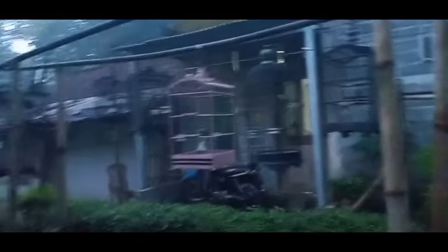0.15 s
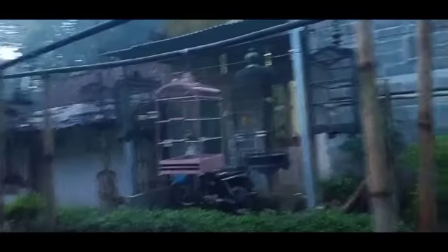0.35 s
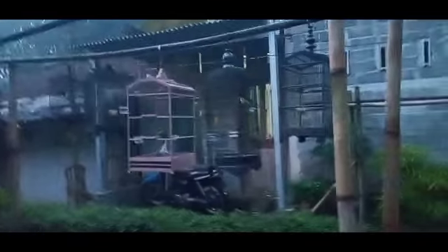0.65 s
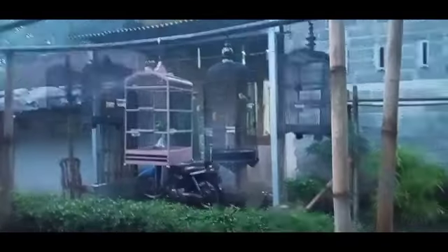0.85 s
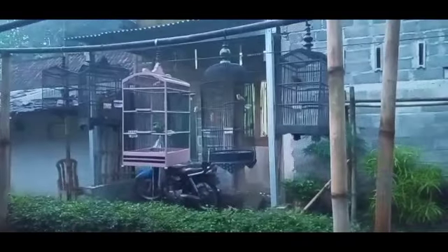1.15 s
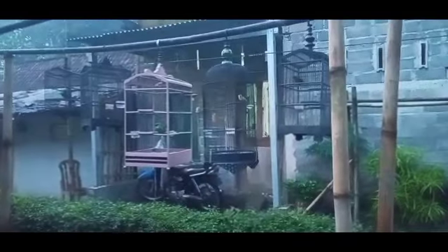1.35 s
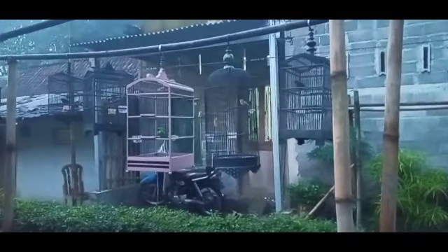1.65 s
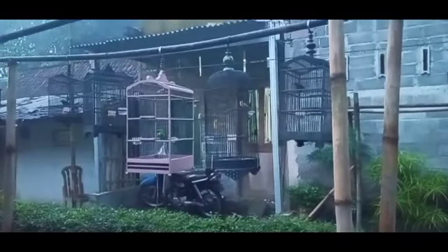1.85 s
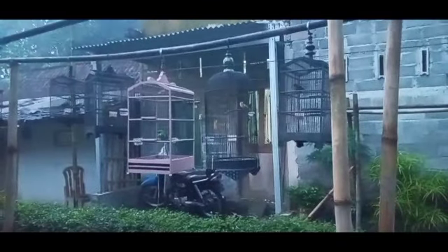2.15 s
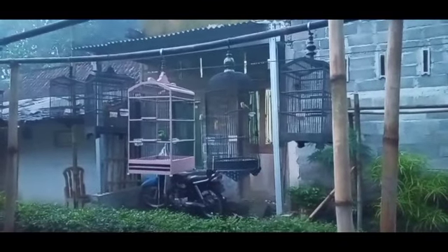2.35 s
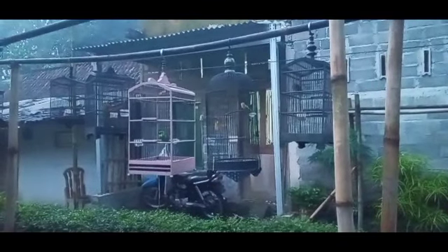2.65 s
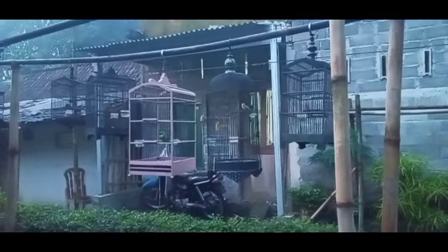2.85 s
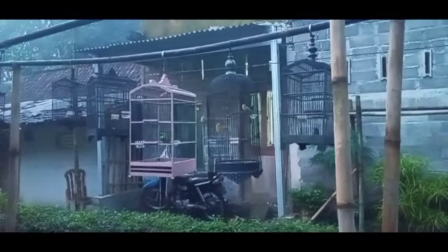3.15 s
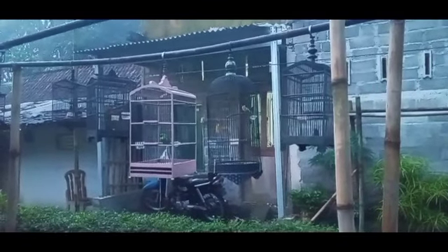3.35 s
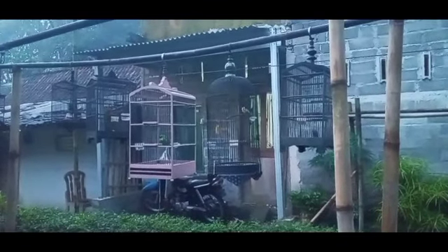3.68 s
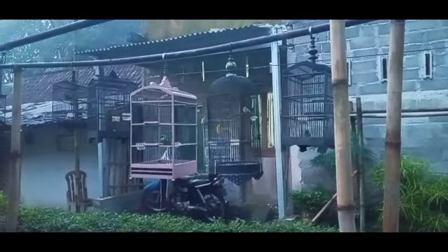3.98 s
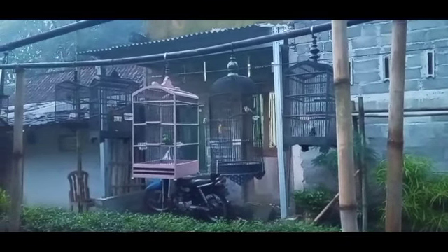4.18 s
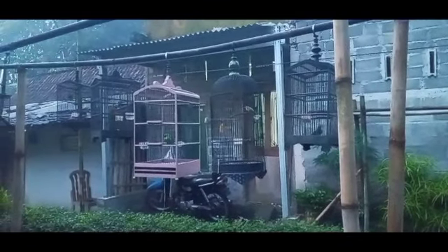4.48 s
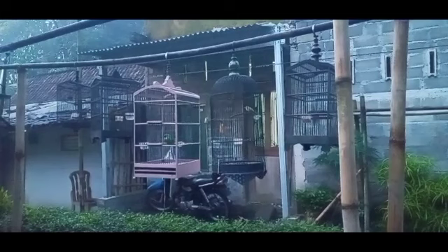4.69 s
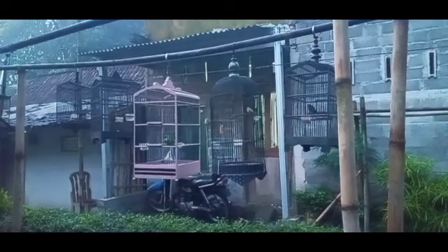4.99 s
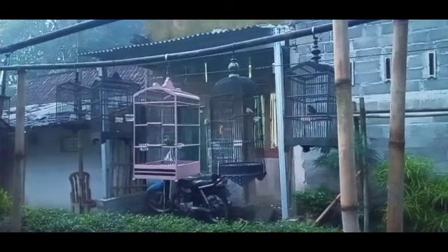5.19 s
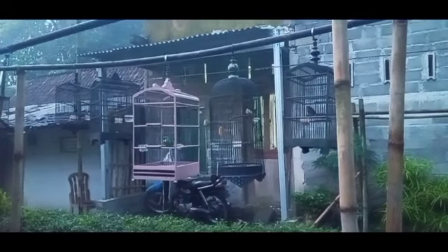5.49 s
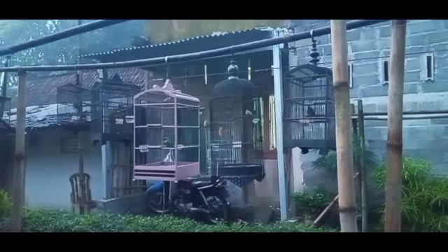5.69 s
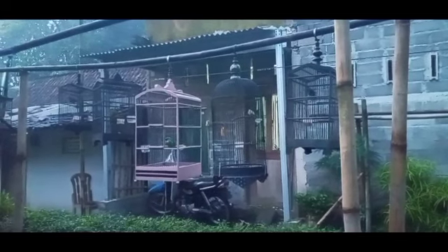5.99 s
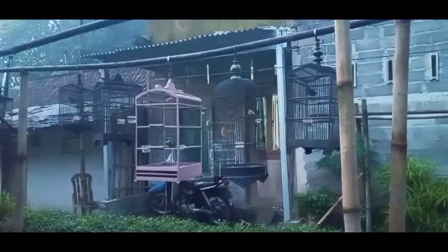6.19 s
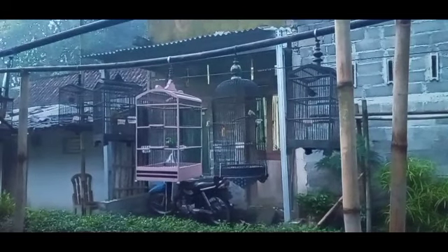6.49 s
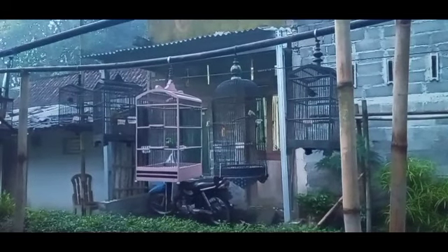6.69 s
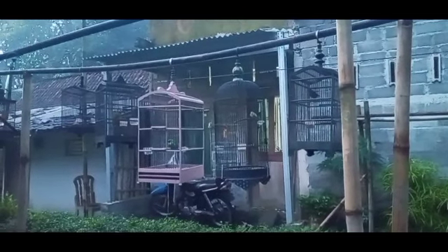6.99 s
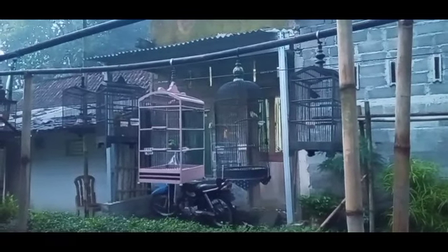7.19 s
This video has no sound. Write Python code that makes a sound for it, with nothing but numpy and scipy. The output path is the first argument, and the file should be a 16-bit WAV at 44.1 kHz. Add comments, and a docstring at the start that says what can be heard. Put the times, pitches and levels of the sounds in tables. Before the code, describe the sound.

Close, piercing birdsong at dawn: sliding high whistles, then a steady run of chirped triplets, with far-off hoarse crowing and soft yard hiss.

```python
"""Caged songbirds at dawn

Early morning under the eaves of a village house, heard by two microphone ports close to the cages.
One near bird pours out loud falling whistles and another repeats triple chirps: gliding, nearly pure tones.
Other birds call from further off; distant roosters crow in strained pulses, and a cage rings under hopping feet.
Insects buzz as narrow wavering tones over shaped noise for the village rumble and hiss.
Walls and roof answer with separate echoes, dense scatter and a yard tail; the loud song ducks the rest."""
import sys
import numpy as np
from scipy import signal
from scipy.fft import rfft, irfft, next_fast_len
from scipy.io import wavfile
from scipy.ndimage import uniform_filter1d

SR = 44100
rng = np.random.default_rng(int(sys.argv[2]) if len(sys.argv) > 2 else 0)


def store_wav(level_fs):
    """Save 16-bit WAV to argv[1]."""
    pcm = np.round(np.clip(np.atleast_2d(level_fs), -1, 1) * 32767)
    wavfile.write(sys.argv[1], SR, pcm.T.astype(np.int16))


N = 323694
TIME = np.arange(N) / SR


def gain_of(db):
    """Decibels to amplitude."""
    return 10 ** (np.asarray(db) / 20)


def evened(x):
    """Scales to rms 1."""
    return x / np.sqrt(np.mean(x ** 2) + 1e-20)


def read(points, hz, axis=1):
    """Reads one column of a spectrum table on a log-frequency axis."""
    columns = np.transpose(points)
    return np.interp(np.log(hz + 1), np.log(columns[0] + 1), columns[axis])


def colour(x, points, axis=1):
    """Filters by a spectrum table."""
    count = x.shape[-1]
    size = next_fast_len(2 * count)
    gains = gain_of(read(points, np.fft.rfftfreq(size, 1 / SR), axis))
    return irfft(rfft(x, size) * gains, size)[..., :count]


def curves(rows):
    """Start time and the columns of a table, sample by sample."""
    s, *columns = np.transpose(rows)
    s = np.sort(s)
    t = np.arange(s[0], s[-1], 1 / SR)
    return s[0], *(np.interp(t, s, c) for c in columns)


def wander(count, rate_hz):
    """Smooth random motion of rms 1: noise under a Gaussian low-pass."""
    spectrum = rfft(rng.standard_normal(count))
    lowpass = np.exp(-(np.fft.rfftfreq(count, 1 / SR) / rate_hz) ** 2)
    return evened(irfft(spectrum * lowpass, count))


def add(mix, s, sound):
    """Mixes a sound in at time s."""
    part = mix[max(round(s * SR), 0):][:len(sound)]
    part += sound[:len(part)]


def delayed(x, s):
    """The same sound s seconds later."""
    return np.concatenate([np.zeros(round(abs(s) * SR)), x])[:N]


def ramp(t, length):
    """Goes straight from 0 to 1 in the given time and stays there."""
    return np.clip(t / length, 0, 1)


def ease(t, length, hold=1):
    """Goes from 0 to 1 along an S; a larger hold puts the move off."""
    return (1 - np.cos(np.pi * ramp(t, length) ** hold)) / 2


def syrinx(s, hz, db, waver=.006, waver_hz=250, second_db=-32, third_db=-60, flutter_db=0, flutter_hz=40):
    """A bird's gliding tone that trembles in pitch and strength and has two weaker overtones."""
    hz = uniform_filter1d(hz, size=130, mode="nearest")
    hz = hz * (1 + waver * wander(len(hz), waver_hz))
    db = db + flutter_db * np.tanh(wander(len(hz), flutter_hz))
    phase = 2 * np.pi * np.cumsum(hz) / SR
    tone = 0
    for k, level_db in enumerate([0, second_db, third_db], 1):
        tone = tone + gain_of(level_db) * np.sin(k * phase) * (k * hz < SR / 2)
    soft_ends = signal.windows.tukey(len(hz), min(160 / len(hz), 1))
    return s, np.sqrt(2) * gain_of(db) * tone * soft_ends


def phrase(notes, **voice):
    """All the notes of one voice, each given as start, pitch curve and level curve."""
    out = np.zeros(N)
    for note in notes:
        add(out, *syrinx(*note, **voice))
    return out


def arch(s, length, first_hz, middle_hz, last_hz, db, crest, edge_db):
    """A plain call: one bow of pitch, swelling to its crest and dying away."""
    u = np.arange(0, length, 1 / SR) / length
    bow_hz = (2 * middle_hz - first_hz - last_hz) * 2 * u * (1 - u)
    hz = first_hz + (last_hz - first_hz) * u + bow_hz
    away = np.interp(u, [0, np.clip(crest, 0, 1), 1], [1, 0, 1])
    return s, hz, db + edge_db * away ** 2


# how long the open yard rings: f/Hz, t60/s
YARD_DECAY = [(500, 0.46), (3000, 0.23), (4500, 0.4), (6500, 0.46), (9000, 0.35), (15000, 0.033)]


def yard(x, near_db, tail_db, echoes=(), lag=0.00103, near_t60=0.038):
    """Direct sound (right port first), single wall echoes, scatter under the eaves and the yard's tail."""
    t = np.arange(SR * 3 // 4) / SR
    signs = rng.choice([-1., 1.], (2, len(t)))
    taps = signs * (rng.random((2, len(t))) < .03) * (t > .004)  # sparse random reflections
    hz, frame_s, z = signal.stft(taps, SR, nperseg=256)
    decay = gain_of(-60 * frame_s / read(YARD_DECAY, hz)[:, None])
    tail = signal.istft(z * decay, SR, nperseg=256)[1][:, :len(t)]
    tail = tail * (1 - np.exp(-t / 0.0067))  # the tail builds up over some milliseconds
    near = taps[:, ::-1] * (t > .003) * np.exp(-np.log(1000) * t / near_t60)
    near = gain_of(near_db) * near / np.linalg.norm(near[0])
    room = near + gain_of(tail_db) * tail / np.linalg.norm(tail[0])
    out = np.array([delayed(x, lag), x])
    for s, left_db, right_db in echoes:
        out += [gain_of(left_db) * delayed(x, s + lag), gain_of(right_db) * delayed(x, s)]
    return out + signal.fftconvolve(x[None], room, axes=1)[:, :N]


# spectrum of the village background, before overall scaling: f/Hz, level per Hz/dB
AIR_SPECTRUM = [(15, -30), (35, -26), (60, -4.5), (90, 3.5), (140, -4), (250, -7), (450, -16), (1000, -13),
                (1600, -9), (3500, -12), (7000, -10), (9500, -5.5), (15500, -25)]
# likeness of the background at the left and right ports: f/Hz, correlation/1
PORT_LIKENESS = [(60, 0.88), (130, 0.68), (250, -0.47), (600, -0.24), (2000, 0.18)]


def air():
    """Village rumble and faint hiss: noise strongly alike at both ports only in the bass, which comes in lumps."""
    a, b = rfft(rng.standard_normal((2, N)))
    same = np.clip(read(PORT_LIKENESS, np.fft.rfftfreq(N, 1 / SR)), -1, 1)
    pair = irfft([a, same * a + np.sqrt(1 - same ** 2) * b], N)
    noise = evened(colour(pair, AIR_SPECTRUM))
    rumble = colour(noise, [(150, 0), (300, -10), (800, -50)])  # low-pass: f/Hz, level/dB
    lumps = gain_of(2 * wander(N, 10))
    swell = gain_of(1.2 * wander(N, 6))
    return gain_of(-62.5) * swell * (noise + (lumps - 1) * rumble)


def insect(hz, width_hz, db, throb_hz, depth_db):
    """A narrow buzz from the hedge: a wavering tone whose level swings in uneven throbs."""
    throb = gain_of(depth_db * np.sin(2 * np.pi * throb_hz * TIME + 2 * wander(N, 30)))
    buzz = np.sin(2 * np.pi * np.cumsum(hz + width_hz * wander(N, 250)) / SR)
    return yard(gain_of(db) * evened(buzz * throb), near_db=-1.5, tail_db=-19.5)


# distant roosters' notes: t/s, length/s, first f/Hz, middle f/Hz, last f/Hz, level/dB, loudest at/0-1,
# roughness/0-1, beak ring f/Hz, beak ring level/dB
CROW_NOTES = [(1.322, .36, 676.5, 817.6, 941, -60, 0.76, 0.36, 1850, 0),
              (1.70, .33, 931, 862.4, 689, -60.5, 0.62, 0.2, 1670, -8.5),
              (3.722, 0.16, 595.5, 616, 680, -74.5, 0.8, 0.42, 1440, -9),
              (4.079, 0.72, 770, 757, 714, -75, 0.24, 0.01, 1440, -4),
              (4.802, .20, 653, 615, 587, -71.5, 0.48, 0.18, 1850, -11),
              (5.628, 0.63, 695.4, 793, 672, -59.5, 0.53, 0.44, 1900, 5.5),
              (6.217, .12, 663, 646.5, 611, -58.5, 0.63, 0.7, 1400, 14),
              (6.418, .70, 634.6, 754, 658.5, -58, 0.7, 0.39, 1440, 10),
              (7.059, 0.3, 618.6, 638.4, 687, -59.5, 0.17, 0.32, 1350, 7)]
# a rooster's throat, dulled by distance: f/Hz, level/dB
ROOSTER_THROAT = [(400, -26.5), (700, -2), (1050, -9.5), (1450, 0.5), (1900, -2), (2400, -8), (3000, -9),
                  (4000, -18.5), (6000, -67.5)]


def roosters(jitter=0.0243, rasp=0.0692, half_db=-4, flutter_db=4, beak_width_hz=200, hoarse_db=18):
    """Strained, uneven pulses; hoarse parts jitter and alternate strong and weak, which adds half lines."""
    out = np.zeros(N)
    for *note, rough, beak_hz, beak_db in CROW_NOTES:
        s, hz, db = arch(*note, edge_db=-11)
        shake = jitter * wander(len(hz), 40.1) + rasp * rough * wander(len(hz), 398)
        phase = 2 * np.pi * np.cumsum(hz * (1 + shake)) / SR
        voice = np.zeros(len(hz))
        for k in range(1, 6):
            beak = gain_of(beak_db / (1 + ((k * hz - beak_hz) / beak_width_hz) ** 2))
            half_line = gain_of(half_db) * 2 * rough * np.cos((k + .5) * phase)
            voice += beak * np.cos(k * phase) + half_line
        voice += gain_of(hoarse_db) * rough ** 2 * rng.standard_normal(len(hz))  # turbulence in the throat
        effort = gain_of(db + flutter_db * np.tanh(wander(len(hz), 10.5)))
        add(out, s, effort * evened(colour(voice, ROOSTER_THROAT)) * signal.windows.tukey(len(hz), .08))
    return gain_of(-3.5) * yard(out, near_db=4, tail_db=4)


# thin, high whistles from another cage: t/s, length/s, top f/Hz, level/dB
THIN_WHISTLES = [(3.742, 0.22, 7540, -35.5), (4.111, .19, 7556, -46.5), (4.413, 0.11, 7370, -44.5),
                 (4.57, 0.063, 7330, -45)]
# depth of the scoop as a share of pitch, its decay in s; rise of the arch as a share of pitch
SCOOP, SCOOP_S, WHISTLE_ARCH = 0.095, 0.011, .035


def whistle(s, length, top_hz, db):
    """A shallow arch of pitch that scoops up from below and is loudest early."""
    ends_hz = top_hz * (1 - WHISTLE_ARCH)
    s, hz, db = arch(s, length, ends_hz, top_hz, ends_hz, db, crest=0.16, edge_db=-10)
    return s, hz * (1 - SCOOP * np.exp(-np.arange(len(hz)) / SR / SCOOP_S)), db


def trill(*note, rate_hz=14, depth_db=6):
    """A long call beaded by an even pulsing, depth_db up and down."""
    s, hz, db = arch(*note, edge_db=-5)
    return s, hz, db - depth_db * np.cos(2 * np.pi * rate_hz * np.arange(len(hz)) / SR)


# The next four share their columns:
# t/s, length/s, first f/Hz, middle f/Hz, last f/Hz, level/dB, loudest at/0-1
# clear falling whistles [columns above]
FALLING_WHISTLES = [(0.0, 0.035, 3640, 3505, 3310, -46.5, 0), (7.098, .115, 3250, 3000, 2830, -44, 0.28)]
# low whistles and squeaks [columns above]
LOW_CALLS = [(3.096, 0.028, 1840, 1654, 1520, -54, 0.8), (6.588, .185, 1612, 1865, 1281, -52, 0.9)]
# raspy notes beyond the yard [columns above]
RASPY_CALLS = [(0.262, 0.097, 8360, 7040, 5770, -29, 0.72), (1.527, 0.17, 4750, 4600, 4890, -44, 1),
               (2.515, 0.1, 8100, 7040, 6130, -28.5, .7), (5.886, 0.077, 7880, 6620, 5390, -36, .4)]
# a far bird's beaded trills [columns above]
FAR_TRILLS = [(2.051, .93, 2897, 2828, 2765, -60, 0.1), (5.019, 1.25, 2863, 2840, 2732, -57.5, 0.32)]


def neighbours():
    """Whistles from other cages; raspy notes and trills come from far off and arrive mostly as echo."""
    clear_notes = [whistle(*row) for row in THIN_WHISTLES]
    clear_notes += [arch(*row, edge_db=-11.5) for row in FALLING_WHISTLES]
    low_notes = [arch(*row, edge_db=-4.5) for row in LOW_CALLS]
    raspy_notes = [arch(*row, edge_db=-16) for row in RASPY_CALLS]
    long_notes = [trill(*row) for row in FAR_TRILLS]
    clear = phrase(clear_notes, waver=0.0066, waver_hz=150, second_db=-43)
    low = phrase(low_notes, waver=0.019, waver_hz=149, second_db=-10, flutter_db=3.5)
    raspy = phrase(raspy_notes, waver=.05, waver_hz=400, second_db=-60, flutter_db=6, flutter_hz=120)
    trills = phrase(long_notes, waver=.02, waver_hz=200, second_db=-40, flutter_db=5, flutter_hz=60)
    close = yard(clear + gain_of(-3) * low, near_db=-3.5, tail_db=-6)
    far = yard(raspy + gain_of(-3.5) * trills, near_db=4, tail_db=-1)
    return gain_of(2) * close + gain_of(-4) * far


# birds land on their perches: t/s, direct peak level/dB
PERCH_HOPS = [(0.941, -48), (4.616, -58)]
# ringing modes of the light cage frame: f/Hz, level/dB, t60/s
CAGE_MODES = [(1000, -16, 0.12), (1550, -18, 0.32), (1767, -3, 0.16), (2233, 6, 0.052), (2750, 4, 0.09)]


def hops():
    """Feet land on a perch and the cage frame rings briefly, its decaying modes a little detuned each time."""
    t, out = np.arange(SR // 5) / SR, np.zeros(N)
    for s, peak_db in PERCH_HOPS:
        ring = np.zeros(len(t))
        for hz, db, t60 in CAGE_MODES:
            mode_hz = hz * rng.uniform(0.938, 1.04)
            ring += gain_of(db) * np.exp(-np.log(1000) * t / t60) * np.sin(2 * np.pi * mode_hz * t)
        add(out, s, gain_of(peak_db) * ring / abs(ring).max())
    return yard(out, near_db=9, tail_db=-20)


# the chirper's steady run: start in s, first period in s, slowing in s, level in dB
RUN_START, RUN_PERIOD_S, RUN_SLOWING_S, RUN_DB = 4.388, .2442, 0.00025, -22


def even_run(count):
    """Time and level of each triple in an even run that slows a little."""
    return [(RUN_START + k * (RUN_PERIOD_S + k * RUN_SLOWING_S), RUN_DB) for k in range(count)]


# triple chirps outside the run, two of them faint: t/s, level/dB
SINGLE_TRIPLES = [(0.0, -38.5), (.068, -25), (0.283, -20), (3.706, -21), (3.923, -23), (4.169, -22),
                  (6.454, -38)]
# the three chirps of a triple: t from its start/s, level/dB
TRIPLE_BEATS = [(0, -4), (0.0355, -4), (.069, -4.5)]
# one chirp's down-sweep: t from its start/s, f/Hz, level/dB
CHIRP_SWEEP = [(0, 5700, -27), (.0045, 4930, -0.5), (.011, 4675, 6), (.016, 4240, 3.5), (.020, 3950, -16),
               (.024, 3800, -38)]
# walls near the chirper, and one across the yard: delay t/s, left level/dB, right level/dB
CHIRPER_WALLS = [(.0075, -11, -21.5), (.0112, -9, -15.5), (.0155, -24.5, -2), (.078, -17, -14.5)]


def chirper():
    """A short down-sweep three times over, never quite alike; its run has about four groups a second."""
    triples = SINGLE_TRIPLES + even_run(count=8)
    beats = [(s + after, db + accent_db) for s, db in triples for after, accent_db in TRIPLE_BEATS]
    slips = rng.standard_normal((len(beats), 2)) * (30, .8)  # Hz, dB
    chirps = []
    for (s, db), (slip_hz, slip_db) in zip(beats, slips):
        chirps.append(curves(np.add(CHIRP_SWEEP, (s, slip_hz, db + slip_db))))
    song = phrase(chirps, waver=0.0014, waver_hz=200, second_db=-26, third_db=-61.5)
    heard = yard(song, near_db=-8.5, tail_db=-12.5, echoes=CHIRPER_WALLS, lag=.00125, near_t60=.12)
    return gain_of([[.5], [-1.5]]) * heard  # left, right


# the near singer's voice is weaker at both ends of its range: f/Hz, level/dB
VOICE_RANGE = [(3200, -9.5), (4200, -0.5), (6900, 0), (8200, -5)]
# opening flick: duration in s, share of pitch, starting level in dB; bloom to full strength: s, dB
FLICK_S, FLICK, FLICK_DB, BLOOM_S, BLOOM_DB = .006, .35, -10, 0.014, -4.5
# unsteady pitch: share of pitch, rate in Hz
STUMBLE, STUMBLE_HZ = .011, 70


def flicked(s, t, hz, db):
    """Opens a note with a quick flick up from below, then lets it bloom; the pitch is never quite smooth."""
    below = 1 - ramp(t, FLICK_S)
    hz = hz * (1 - FLICK * below) * (1 + STUMBLE * wander(len(t), STUMBLE_HZ))
    bloom_db = BLOOM_DB * (1 - ramp(t, BLOOM_S))
    return s, hz, db + FLICK_DB * below + bloom_db + read(VOICE_RANGE, hz)


REBOUND_S, DROP_S, DROP_DB = 0.016, .016, -14.5  # rebound; closing drop and its fade


def syllable(s, length, top_hz, fall_s, fall_hold, dip_hz, rebound_hz, slide_hold, foot_hz, drop_share,
             fall_db, slide_db):
    """Flick, steep fall into a dip, rebound, slower slide and a closing drop."""
    t = np.arange(0, length, 1 / SR)
    slide_start, drop_start = fall_s + REBOUND_S, length - DROP_S
    fall = ease(t, fall_s, fall_hold)
    rebound = ease(t - fall_s, REBOUND_S)
    slide = ease(t - slide_start, drop_start - slide_start, slide_hold)
    drop = ramp(t - drop_start, DROP_S)
    hz = top_hz + (dip_hz - top_hz) * fall + (rebound_hz - dip_hz) * rebound + (foot_hz - rebound_hz) * slide
    db = fall_db + (slide_db - fall_db) * rebound + DROP_DB * drop
    return flicked(s, t, hz * (1 - drop_share * drop), db)


def pickup(s, length, top_hz, end_hz, db):
    """Only the flick and the fall, fading as it goes down."""
    t = np.arange(0, length, 1 / SR)
    fall = ease(t, length, hold=1.25)
    return flicked(s, t, top_hz + (end_hz - top_hz) * fall, db - 11 * fall)


WARBLE_START, WARBLE_S, WARBLE_DB, WARBLE_FADE_DB = .513, 0.18, -22.5, -12.5
WARBLE_FROM_HZ, WARBLE_TO_HZ, WARBLE_SWING_HZ = 4800, 4940, 550
WARBLE_LIFT_HZ = 188  # every second sweep reaches higher
WARBLE_OPEN_S, SWEEP_S, SWEEP_RISE = 0.03, .0192, .75  # SWEEP_RISE: share of a sweep spent climbing


def warble():
    """Pitch climbs and snaps back about fifty times a second, high and low in turn, opening out then fading."""
    t = np.arange(0, WARBLE_S, 1 / SR)
    opening, turns = 1 - np.exp(-t / WARBLE_OPEN_S), t / SWEEP_S
    sweeps = WARBLE_SWING_HZ * signal.sawtooth(2 * np.pi * turns, SWEEP_RISE)
    sweeps = sweeps + WARBLE_LIFT_HZ * np.sin(np.pi * turns)
    hz = WARBLE_FROM_HZ + opening * (WARBLE_TO_HZ - WARBLE_FROM_HZ + sweeps)
    hz = hz * (1 + STUMBLE * wander(len(t), STUMBLE_HZ))
    return WARBLE_START, hz, WARBLE_DB + WARBLE_FADE_DB * (t / WARBLE_S) ** 6


# the near singer's long syllables: t/s, length/s, top f/Hz, fall/s, fall hold/1, dip f/Hz, rebound f/Hz,
# slide hold/1, foot f/Hz, drop share/1, fall level/dB, slide level/dB
# (a hold under 1 moves early, over 1 late)
SONG_SYLLABLES = [(0.203, 0.15, 7190, .040, 1.7, 5410, 4970, .7, 3760, .18, -22, -26.5),
                  (.412, 0.13, 6720, 0.049, 1.7, 4710, 4210, 0.32, 4155, 0, -22, -28),
                  (0.76, 0.18, 7070, 0.049, .9, 5370, 5500, .62, 3913, .15, -21, -22),
                  (.963, 0.17, 6770, 0.077, 0.68, 5280, 5610, .9, 4287, .1, -21.5, -22.5),
                  (1.646, 0.23, 8200, 0.04, 1.5, 6120, 6650, 0.99, 4675, 0.18, -21.5, -23),
                  (1.988, 0.22, 8020, 0.047, 1.5, 5990, 6615, .92, 4676, 0.17, -20, -21.5),
                  (2.401, 0.15, 6970, 0.059, 1.45, 5100, 5300, 0.51, 4067, .2, -22.5, -23),
                  (2.714, .138, 6735, 0.057, 2.0, 5290, 5010, 0.76, 4015, 0.18, -23, -24.5),
                  (2.987, 0.15, 6940, .058, 1.45, 5310, 5980, .68, 4926, 0.22, -22.5, -21.5),
                  (3.225, 0.15, 8230, 0.049, 1.1, 5110, 4600, .6, 4057, 0.213, -22.5, -22.5),
                  (3.478, 0.16, 7090, 0.054, 1.4, 5115, 5180, 0.43, 4180, .19, -23.5, -24),
                  (7.265, 0.13, 8550, 0.045, 1.05, 5100, 4650, 0.62, 4020, .17, -24.5, -29.5)]
# short falls that lead into a syllable: t/s, length/s, top f/Hz, end f/Hz, level/dB
SONG_PICKUPS = [(2.331, .050, 6470, 4223, -18), (2.643, .050, 6275, 4066, -18.5),
                (3.406, 0.056, 6066, 4120, -20.5)]
# walls and eaves beside the singer: delay t/s, left level/dB, right level/dB
SINGER_WALLS = [(.0018, -31, -28), (.0043, -13.5, -25.5), (.0092, -9.5, -13.5), (.0155, -13.5, -3)]


def singer():
    """The near bird: syllables flick up to a high start and slide far down; one runs on into a warble."""
    notes = [syllable(*row) for row in SONG_SYLLABLES]
    notes += [pickup(*row) for row in SONG_PICKUPS]
    notes.append(warble())
    song = phrase(notes, waver=.011, waver_hz=239, second_db=-27.5, third_db=-30, flutter_db=3.5, flutter_hz=150)
    heard = yard(song, near_db=-4.5, tail_db=-11, echoes=SINGER_WALLS, lag=.0009, near_t60=0.15)
    return gain_of([[7.7], [5.2]]) * heard  # left, right


def scene():
    """The air of the yard, insects, roosters and birds, from the background to the near singer."""
    low_insect = insect(hz=5960, width_hz=56, db=-65, throb_hz=36.2, depth_db=10)
    high_insect = insect(hz=8577, width_hz=230, db=-59, throb_hz=6.9, depth_db=5)
    background = air() + low_insect + high_insect + roosters()
    return background + neighbours() + hops() + chirper() + singer()


# colour of the two microphone ports: f/Hz, left level/dB, right level/dB
PORT_COLOUR = [(99, 11, 8.5), (605, 14, 11.5), (1450, 9.5, 3.5), (3120, 7, 2), (4510, 0, -7.5),
               (6320, 5.5, -3), (7800, 3.5, -15.5), (9160, -15, -28), (11050, -21.5, -19.5),
               (13000, -16.5, -5.5), (15200, 10, 14.5)]
EDGE_HZ = 15850  # upper band limit


def record(dry, threshold_db=-30, squeeze=0.3, peak_fall_db_per_s=28):
    """Each port has its own colour; gain control ducks everything under the loud song; then the band limit."""
    ports = np.array([colour(dry[0], PORT_COLOUR, axis=1), colour(dry[1], PORT_COLOUR, axis=2)])
    power = uniform_filter1d((ports ** 2).mean(0), size=600)
    power_db = 10 * np.log10(abs(power) + 1e-12)
    # the held level jumps up with the sound and falls back at a steady rate
    fall_db = peak_fall_db_per_s * TIME
    held_db = np.maximum.accumulate(power_db + fall_db) - fall_db
    over_db = np.maximum(held_db - threshold_db, 0)
    ducked = ports / gain_of(squeeze * uniform_filter1d(over_db, size=300))
    lowpass = signal.firwin(511, EDGE_HZ, window=("kaiser", 9), fs=SR)
    return signal.oaconvolve(ducked, lowpass[None], "same")


dry = scene()
out = record(dry)
store_wav(out)
```